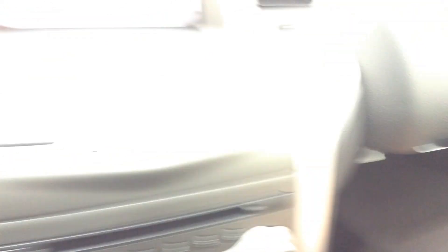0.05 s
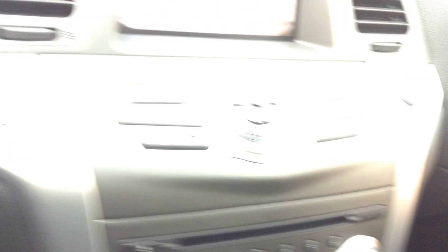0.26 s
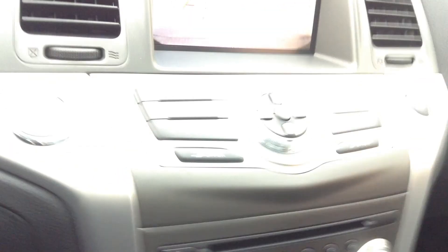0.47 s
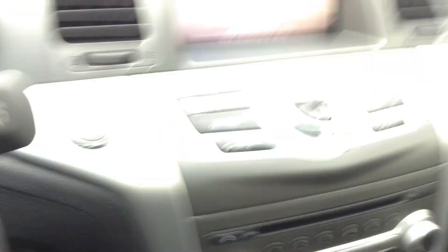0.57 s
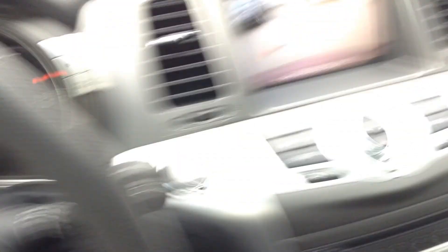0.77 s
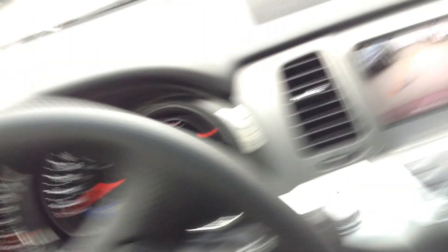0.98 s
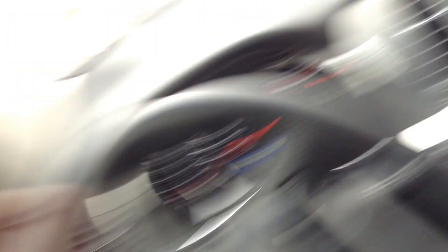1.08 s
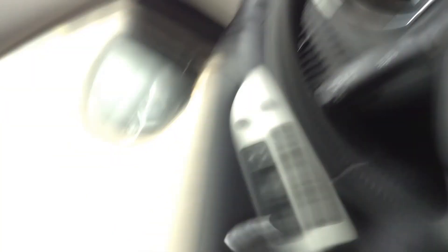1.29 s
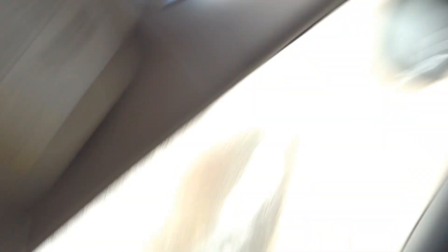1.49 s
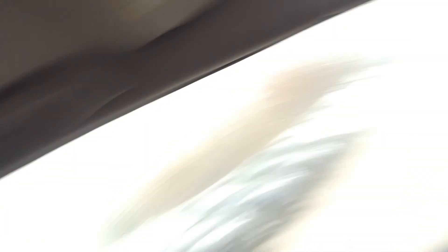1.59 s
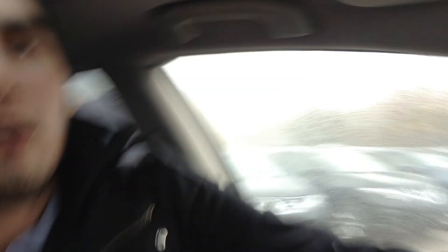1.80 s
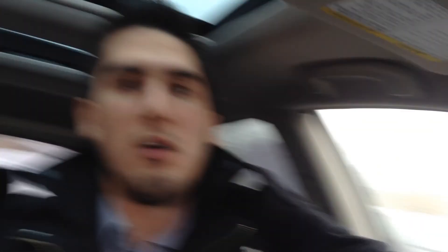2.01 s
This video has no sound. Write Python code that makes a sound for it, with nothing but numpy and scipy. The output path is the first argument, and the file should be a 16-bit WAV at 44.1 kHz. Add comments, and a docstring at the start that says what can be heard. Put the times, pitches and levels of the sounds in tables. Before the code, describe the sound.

A plastic glove box lid swings up with a faint rising whistle and snaps shut at about 0.23 seconds, rattling briefly with dull dashboard thuds. A sleeve swishes softly from 0.5, light taps come near 0.8, and a sharp double click on the recorder's housing at 0.96 leads into scraping. A small hollow knock follows at 1.3, a crisp tick at 1.5, over faint cabin hum and hiss.

```python
"""A plastic glove box lid swings up and snaps shut in a parked car, heard by a small handheld recorder close by.
The lid is noise with a rising whistle, then rattling contacts that ring plastic modes and echo dully.
A hand on the recorder's housing taps, knocks and slides (clicks and grains into resonances), a sleeve swishes
in sinking noise bands, and the padded cabin hums and hisses faintly in flickering noise.
Whatever touches the housing rings in the microphone port near 6 kHz."""
import sys
import numpy as np
from scipy import signal
from scipy.fft import rfft, irfft, next_fast_len
from scipy.io import wavfile

SR = 44100
rng = np.random.default_rng(int(sys.argv[2]) if len(sys.argv) > 2 else 0)


def attenuation_scalar(level_db):
    """Turn a level in dB into a linear amplitude multiplier (20 dB per decade)."""
    decades = np.asarray(level_db, float) / 20
    return 10 ** decades


def waveform_to_disk(signal):
    """Save audio, clipped to [-1, 1], as 16-bit WAV at the path in sys.argv[1]."""
    frames = np.transpose(np.atleast_2d(signal))
    scaled = np.clip(frames, -1, 1) * 32767
    samples = np.round(scaled).astype(np.int16)
    wavfile.write(sys.argv[1], SR, samples)


N = 90404  # length in samples


def rms_one(x):
    """Scales a signal to rms 1."""
    return x / np.sqrt(np.mean(x ** 2) + 1e-20)


def in_time(rows, outside=-90):
    """Columns of a curve in dB at every sample; the value outside holds beyond its ends."""
    s, *columns = np.transpose(rows)
    return [np.interp(np.arange(N) / SR, s, column, outside, outside) for column in columns]


def drift(rate_hz):
    """Slow chance of rms 1: noise through two equal one-pole low-passes, run at every 40th sample."""
    r = np.exp(-2 * np.pi * rate_hz * 40 / SR)
    noise = rng.standard_normal(N // 40 + 2002)
    slow = signal.lfilter([1], [1, -2 * r, r * r], noise)[2000:]  # drops the settling
    return np.interp(np.arange(N) / 40, np.arange(len(slow)), rms_one(slow))


def ring(strikes, modes):
    """Each mode (Hz, dB, t60 in seconds) is a two-pole resonator: strikes set a decaying sine ringing."""
    out = 0
    for hz, db, t60 in modes:
        r, w = attenuation_scalar(-60 / (t60 * SR)), 2 * np.pi * hz / SR
        out = out + signal.lfilter([0, attenuation_scalar(db) * np.sin(w)], [1, -2 * r * np.cos(w), r * r], strikes + 1e-18)
    return out


def peaks(x, bands):
    """Parallel resonances (Hz, width in Hz, dB), each of about unit gain before its dB, in alternating sign."""
    out = 0
    for k, (hz, width_hz, db) in enumerate(bands):
        r = np.exp(-np.pi * width_hz / SR)
        poles = [1, -2 * r * np.cos(2 * np.pi * hz / SR), r * r]
        resonance = signal.lfilter([(1 - r * r) / 2, 0, (r * r - 1) / 2], poles, x)
        out = out + (-1) ** k * attenuation_scalar(db) * resonance
    return out


def cut(x, hz, kind, order=2):
    """Butterworth filter."""
    return signal.sosfilt(signal.butter(order, hz, kind, fs=SR, output="sos"), x + 1e-18)


def grains(per_s, spread_db):
    """Random clicks of uneven size and either sign, rms 1."""
    sizes = attenuation_scalar(spread_db * np.minimum(rng.exponential(1, N), 4)) * rng.choice([-1, 1], N)
    return rms_one(sizes * (rng.random(N) < per_s / SR))


def decays(s, db, decay_s):
    """Sum of sudden exponential envelopes, decay_s being the time constants."""
    age = np.arange(N) / SR - np.array(s)[:, None]
    fall = np.exp(-np.maximum(age, 0) / np.array(decay_s)[:, None])
    return (attenuation_scalar(np.array(db))[:, None] * fall * (age >= 0)).sum(axis=0)


def clicks(s, db):
    """Single-sample impulses."""
    out = np.zeros(N)
    out[(np.array(s) * SR).astype(int)] = attenuation_scalar(np.array(db))
    return out


def gliding_noise(hz, width_hz):
    """A narrow noise band whose centre follows hz: two slow noises carried by a sine and a cosine, rms 1."""
    a, b = cut(rng.standard_normal((2, N)), width_hz, "low")
    phase = 2 * np.pi * np.cumsum(hz) / SR
    return rms_one(a * np.sin(phase) + b * np.cos(phase))


# Colour of the quiet cabin. Each row: frequency in Hz, relative noise density in dB per Hz.
CABIN_COLOUR = [(25, -25), (60, -13.5), (110, -8.5), (210, 2), (320, -6.5), (500, -8), (900, -14.5),
                (1600, -9), (2200, -9.5), (3000, -13.5), (4300, -15.5), (6200, -6), (8000, -13),
                (11000, -21), (14400, -21), (16000, -36)]
# Cabin noise over time. Each row: time in seconds, relative level in dB.
CABIN_LEVEL = [(0.0, -43), (0.21, -45), (0.34, -46.5), (0.98, -44), (1.15, -45), (1.33, -45), (1.48, -42),
               (2.05, -47)]
# Swing of the top hiss. Each row: time in seconds, gain in dB.
TOP_HISS = [(0, 3), (.3, 4.5), (.45, -0.5), (.9, 0.5), (1.05, -6), (1.065, 11), (1.085, 5), (1.095, -4),
            (1.6, -4), (1.85, 3.5), (2.05, 3)]


def cabin():
    """Third-octave bands of noise, each flickering on its own; the top hiss also swings."""
    mid_share = 0.37  # share of the top hiss's swing, in dB, heard in the bands from about 2.4 to 5 kHz
    edges = 30 * 2 ** np.arange(0, 9.3, 1 / 3)
    white = rng.standard_normal((2, N))
    hz, db = np.transpose(CABIN_COLOUR)
    top_db, = in_time(TOP_HISS, outside=0)
    out = 0
    for k, (low, high) in enumerate(zip(edges, edges[1:])):
        flicker_db = 2.2 * drift(10)
        colour_db = np.interp(np.log(low * high) / 2, np.log(hz), db)
        share = 1 if low > 7500 else mid_share * (2400 < low < 5200)
        level_db = colour_db + flicker_db + top_db * share
        out = out + attenuation_scalar(level_db) * cut(white[k % 2], [low, high], "band")
    return attenuation_scalar(in_time(CABIN_LEVEL, outside=-50)[0] - 3.5) * rms_one(out)


# Skin sliding on the housing, one table a slide. Each row: time in seconds, level in dB.
SLIDES = [
    [(0.0, -51), (0.028, -52.5), (0.102, -53.5), (0.12, -48), (0.142, -57), (0.172, -41.5), (0.215, -53)],
    [(0.3, -73), (0.336, -67), (0.356, -41.5), (0.396, -64.5), (0.654, -37.5), (0.704, -64), (0.95, -62)],
    [(0.958, -33), (0.973, -39.5), (1.055, -23), (1.069, -39), (1.115, -52.5)],
    [(1.335, -61), (1.347, -52), (1.365, -41.5), (1.381, -36), (1.455, -51.5), (1.484, -38), (1.52, -36.5)],
    [(1.52, -49), (1.636, -76), (1.652, -49.5), (1.69, -51), (1.698, -60), (1.712, -49), (2.05, -49)],
]
# The housing rumbling under firm slides, one table a slide. Each row: time in seconds, level in dB.
FIRM_SLIDES = [
    [(1.0, -36), (1.012, -42), (1.026, -36.5), (1.05, -30), (1.09, -65)],
    [(1.34, -55), (1.35, -51.5), (1.418, -44), (1.442, -55), (1.452, -42.5), (1.5, -59)],
]
# Housing modes under a slide. Each row: frequency in Hz, level in dB, t60 in seconds.
HOUSING = [(226, -5.5, 0.15), (386, 2, 0.012), (720, 2.5, 0.01), (1260, 7.5, 0.004), (1790, -5, 0.0038)]
# The microphone port's resonances, for all that touches it. Each row: frequency in Hz, width in Hz, level in dB.
PORT = [(5700, 1890, -7), (6360, 505, 6.5)]


def rub():
    """Stick-slip grains of skin ring in the port; firm slides shake the housing modes."""
    flutter = attenuation_scalar(2.5 * drift(250))
    slips = grains(4000, spread_db=0.5) * flutter
    skin = rms_one(peaks(slips, PORT)) + attenuation_scalar(-1.5) * cut(slips, [3600, 9500], "band")
    shake = rms_one(ring(grains(2300, spread_db=2.0), HOUSING))
    slide_level = sum(attenuation_scalar(in_time(curve)[0]) for curve in SLIDES)
    firm_level = sum(attenuation_scalar(in_time(curve)[0]) for curve in FIRM_SLIDES)
    return slide_level * skin + firm_level * shake


# Air and hinge while the lid swings. Each row: time in seconds, level in dB.
SWING_LEVEL = [(.02, -56), (.06, -53), (.1, -52), (.15, -45), (.195, -40.5), (.2285, -37.5)]
# Fixed resonances of the swing. Each row: frequency in Hz, width in Hz, level in dB.
SWING_BANDS = [(1670, 370, -16), (2330, 1130, 14)]


def swing():
    """Noise in fixed resonances, and a narrow whistling band that rises as the gap closes."""
    gap_hz, gap_rise_hz_per_s, gap_width_hz = 880, 1700, 70
    whistle = gliding_noise(gap_hz + gap_rise_hz_per_s * np.arange(N) / SR, gap_width_hz)
    flutter = attenuation_scalar(1.5 * drift(40))
    air = rms_one(cut(peaks(rng.standard_normal(N), SWING_BANDS), 4500, "low"))
    return attenuation_scalar(in_time(SWING_LEVEL)[0]) * flutter * (air + attenuation_scalar(-5) * whistle)


# Contacts as the lid seats. Each row: start in seconds, relative strength in dB, brightness in dB over
# that strength, time constant of the rattle in seconds.
SEATS = [(0.2288, -21, 5.5, 0.0033), (0.2324, -11.5, 1.5, 0.0067), (0.2351, -19, -4.5, 0.0097),
         (0.248, -28, 5, 0.013), (0.252, -20, 5.5, 0.0069), (0.2556, -16.5, 0.5, 0.0051),
         (0.267, -22, 0.5, 0.0043), (0.272, -21.5, -14, 0.009), (0.291, -56, -30, 0.0068),
         (0.315, -60, -22, 0.0066)]
# Hard single knocks of the latch on the lid. Each row: start in seconds, strength in dB.
LATCH_BLOWS = [(0.2303, -9.5), (0.2332, -17.5), (0.237, -20), (0.2545, -20), (0.2652, -17)]
# Lid and dashboard modes. Each row: frequency in Hz, level in dB, t60 in seconds.
LID_MODES = [(515, -10, 0.035), (593, -11, 0.03), (776, -12, .045), (854, -8.5, 0.055), (949, -10, 0.055),
             (1045, -9.5, 0.045), (1361, -7, 0.035), (1630, -4, 0.025), (1765, 0, 0.016), (1960, -3, 0.02),
             (2200, -2, 0.014), (2620, -7, 0.018), (3090, -6, 0.004), (4440, -18, 0.029)]
# Soft thuds of the dashboard in answer. Each row: start in seconds, strength in dB.
THUDS = [(0.235, -19), (0.2438, -13.5), (0.254, -15.5), (0.28, -17), (0.309, -28.5), (.35, -45.5)]
# Dashboard modes under the thuds. Each row: frequency in Hz, level in dB, t60 in seconds.
DASH_MODES = [(104, -7, 0.11), (206.8, -2, 0.081), (269, -5.5, 0.055)]


def lid():
    """Contacts rattle into the modes, each mode struck by its own grains, with crack, latch ping and thuds."""
    rattle_per_s = 4600
    s, db, bright_db, decay_s = np.transpose(SEATS)
    force = 0.097 * decays(s, db, decay_s)
    rattle = sum(ring(force * grains(rattle_per_s, spread_db=4.0), [mode]) for mode in LID_MODES)
    thuds = ring(clicks(*np.transpose(THUDS)), DASH_MODES)
    blows = ring(cut(clicks(*np.transpose(LATCH_BLOWS)), 1060, "high"), LID_MODES)
    bright = decays(s, db + bright_db, decay_s) * grains(rattle_per_s, spread_db=3.0)
    crack = attenuation_scalar(-0.5) * cut(bright, [1000, 11100], "band", order=1)
    ping = attenuation_scalar(5) * peaks(bright, PORT)
    return rattle + thuds + blows + crack + ping


def echoes(x):
    """Short echoes of the padded cabin: eight feedback delays, each duller at every pass."""
    t60_s, dull_hz = 0.18, 1630  # the t60 holds for the bass
    grid = next_fast_len(N + SR)
    w = 2 * np.pi * np.arange(grid // 2 + 1) / grid
    dull = 1 / (1 + 1j * w * SR / (2 * np.pi * dull_hz))
    combs = 0
    for k, lag in enumerate(np.geomspace(.004, .013, 8) * SR):
        feedback = attenuation_scalar(-60 * lag / SR / t60_s) * dull * np.exp(-1j * w * lag)
        combs = combs + (-1) ** k * (1 / (1 - feedback) - 1)  # without the direct sound
    return irfft(rfft(x, grid) * combs, grid)[:N]


# Finger taps on the housing. Each row: start in seconds, tick in dB, clack in dB, clack pitch in Hz,
# clack t60 in seconds, thump in dB.
TAPS = [(.3545, -29.5, -30, 3200, 0.0094, -70), (0.7892, -33, -35.5, 770, 0.023, -52),
        (0.7947, -29.5, -70, 800, 0.012, -26), (.843, -28, -43, 1500, 0.0048, -37),
        (.958, -11.5, -23.5, 1770, 0.0016, -33), (0.9656, -3.5, -8.5, 1000, 0.0026, -23.5),
        (0.9892, -14, -17, 760, 0.0032, -22.5), (1.242, -28.5, -57, 2000, .006, -60),
        (1.405, -44, -72, 1500, 0.0065, -32.5), (1.4363, -46, -29.5, 3970, 0.0028, -60),
        (1.5108, -10, -20, 2390, 0.0098, -52)]
# Partials of a clack. Each row: multiple of the clack pitch, level in dB.
CLACK = [(1.0, -1.5), (1.7, 1.5), (2.3, -22)]
# Low modes of a thump. Each row: frequency in Hz, level in dB, t60 in seconds.
THUMP = [(117, -9, 0.04), (227, 0, 0.036), (330, -7, 0.025), (560, -17, 0.022)]


def taps():
    """Each tap is a click: port ring and snap, short clack, loose grains of chatter, low thump."""
    s, tick_db, clack_db, clack_hz, clack_t60, thump_db = np.transpose(TAPS)
    tick_noise = decays(s, tick_db, s * 0 + 0.0007) * rng.standard_normal(N)
    tick = clicks(s, tick_db) + 0.25 * tick_noise
    port = 5.0 * peaks(tick, PORT)
    snap = attenuation_scalar(-6) * cut(tick, [9000, 15500], "band")
    clack = 0
    for start, db, hz, t60 in zip(s, clack_db, clack_hz, clack_t60):
        blow = cut(clicks([start], [db]), max(2550, 1.64 * hz), "low")
        clack = clack + ring(blow, [(k * hz, rel_db, t60 / k) for k, rel_db in CLACK])
    loose = decays(s, clack_db - 13, s * 0 + 0.01) * grains(5500, spread_db=-1.0)
    chatter = cut(loose, [300, 2400], "band", order=4) + 0.17 * cut(loose, [7000, 15000], "band")
    thump = ring(cut(clicks(s, thump_db), 640, "low"), THUMP)
    return port + snap + clack + chatter - thump


# Soft grainy pats. Each row: start in seconds, length in seconds, level in dB, centre in Hz, width in Hz.
PATS = [(0.381, 0.029, -50.5, 1320, 150), (0.781, 0.034, -43, 85, 61), (1.643, 0.019, -47.5, 784, 200),
        (1.644, 0.017, -44.5, 1450, 505)]


def pats():
    """Grains in one resonance under a quick swell and fade."""
    t, out = np.arange(N) / SR, 0
    for s, length, db, hz, width_hz in PATS:
        swell = np.sin(np.pi * np.clip((t - s) / length, 0, 1) ** 1.3) ** 2
        texture = rms_one(peaks(grains(5600, spread_db=-4.5), [(hz, width_hz, 0)]))
        out = out + attenuation_scalar(db) * swell * texture
    return out


# The sleeve's swish. Each row: time in seconds, upper band in dB, lower band in dB.
SWISH = [(.44, -72, -72), (.49, -62, -67), (.53, -49, -59), (.58, -49, -76), (.65, -53.5, -49),
         (.68, -53, -57), (.73, -85.5, -58), (.77, -64, -67), (.85, -66, -54), (.92, -82, -73)]


def sleeve():
    """Fabric squeaks in two narrow noise bands that sink as the sleeve slows."""
    age = np.clip(np.arange(N) / SR - 0.49, 0, 0.15)  # seconds of sinking
    upper_db, lower_db = in_time(SWISH)
    upper = attenuation_scalar(upper_db) * gliding_noise(3500 - 2700 * age, width_hz=170)
    lower = attenuation_scalar(lower_db) * gliding_noise(1626 - 640 * age, width_hz=90)
    return upper + lower


# A hollow knock that rattles, duller as it settles. Each row: start in seconds, relative strength in dB,
# time constant of the rattle in seconds, top of the blow's two octaves in Hz.
KNOCKS = [(1.3025, -43, 0.001, 2970), (1.305, -31.5, 0.0013, 3100), (1.3071, -30, 0.0026, 3050),
          (1.3079, -40, 0.012, 2380), (1.3109, -37, 0.011, 940), (1.3144, -40.5, 0.0089, 590)]
# Modes of the hollow body. Each row: frequency in Hz, level in dB, t60 in seconds.
HOLLOW = [(222, 3, .05), (390, -6, .025), (548, 1, .04), (866, -6, .018), (1185, 0, .015)]


def knock():
    """Blows and their rattle ring a hollow body; the rattle rings the port and crunches broadly."""
    s, db, decay_s, top_hz = np.transpose(KNOCKS)
    rattle = decays(s, db, decay_s) * grains(5500, spread_db=1.0)
    blows = sum(cut(clicks([start], [d + 9]), [hz / 4, hz], "band") for start, d, hz in zip(s, db, top_hz))
    body = ring(blows + attenuation_scalar(-20.5) * rattle, HOLLOW)
    port = attenuation_scalar(16) * peaks(rattle, PORT)
    crunch = attenuation_scalar(0.5) * cut(rattle, [2500, 12000], "band", order=1)
    return body + port + crunch


def scene():
    """The microphone hears little bass from near sources, least from those on its housing."""
    box = lid()
    hand = cut(rub() + taps() + knock(), 170, "high")
    near = swing() + box + attenuation_scalar(-18) * echoes(box) + hand + pats() + sleeve()
    return (cut(near, 150, "high") + cabin())[None]


def low_pass(x):
    """Removes everything above the highest recorded frequency."""
    return signal.sosfilt(signal.butter(12, 16470, fs=SR, output="sos"), x)


def record(dry):
    """The recorder rounds the peaks softly and cuts the top steeply."""
    overload, cutoff_hz = 0.8, 15900
    rounded = overload * np.tanh(dry / overload)
    top_cut = signal.cheby2(10, 40, cutoff_hz, fs=SR, output="sos")
    mix = signal.sosfilt(top_cut, rounded)
    return low_pass(mix)


dry = scene()
out = record(dry)
waveform_to_disk(out)
```